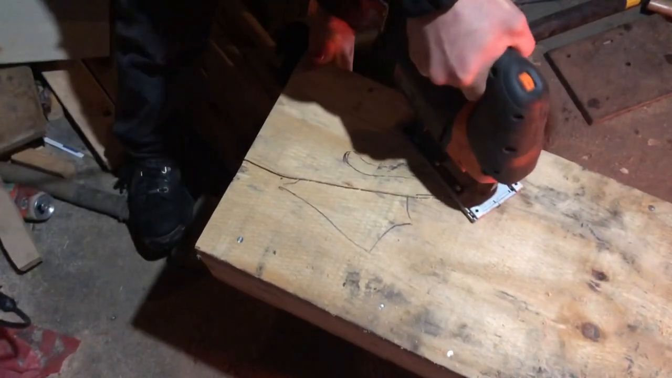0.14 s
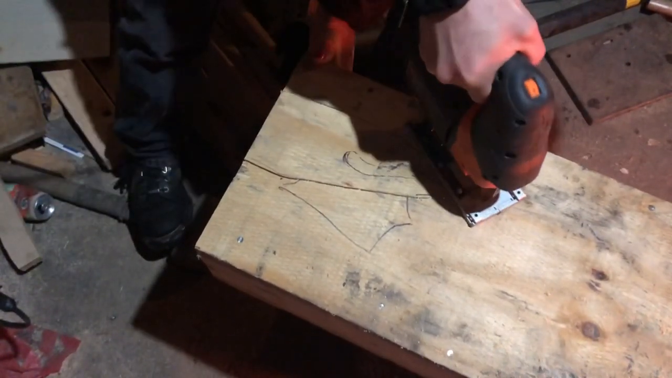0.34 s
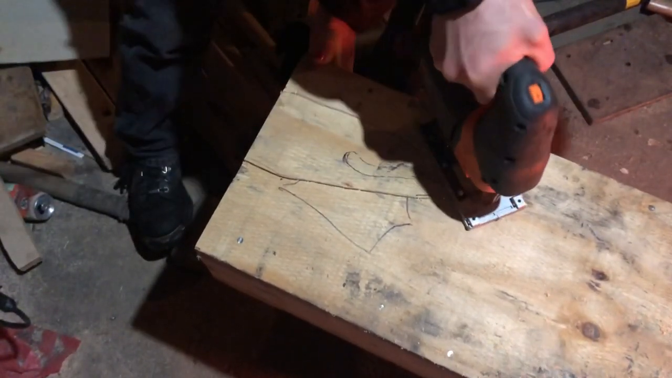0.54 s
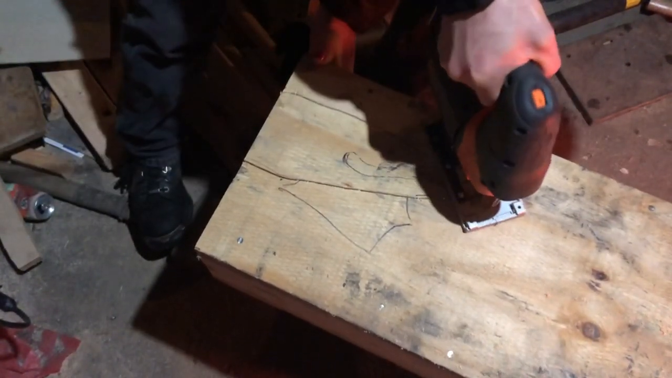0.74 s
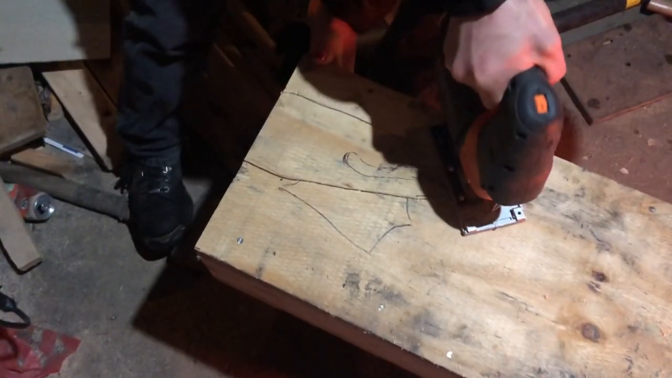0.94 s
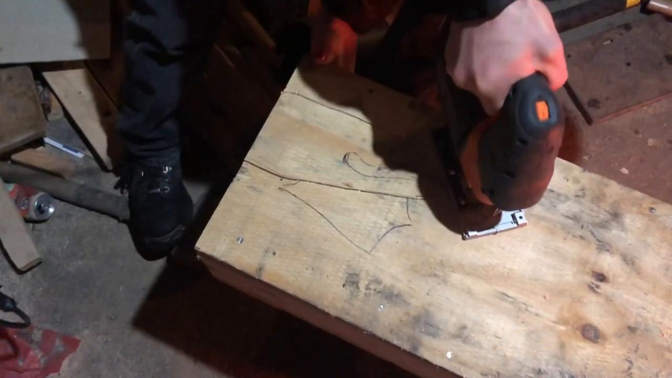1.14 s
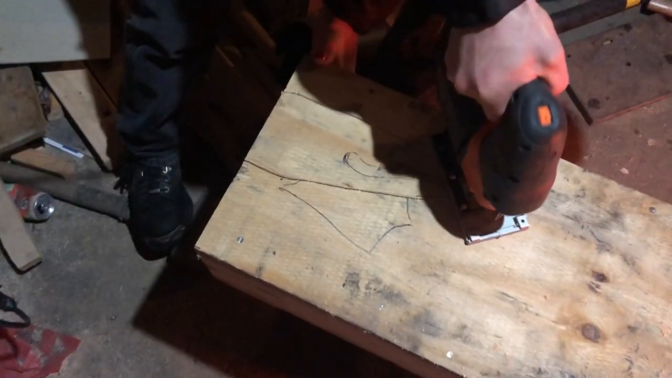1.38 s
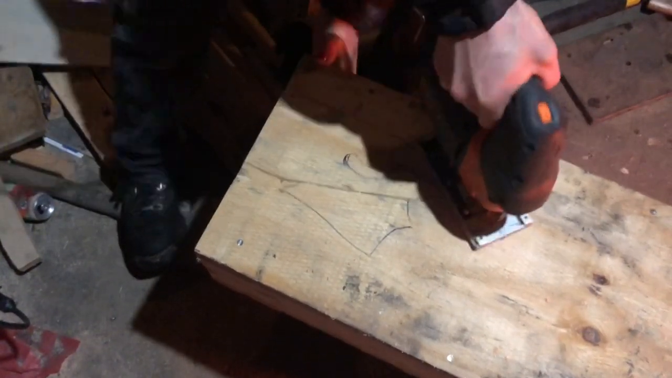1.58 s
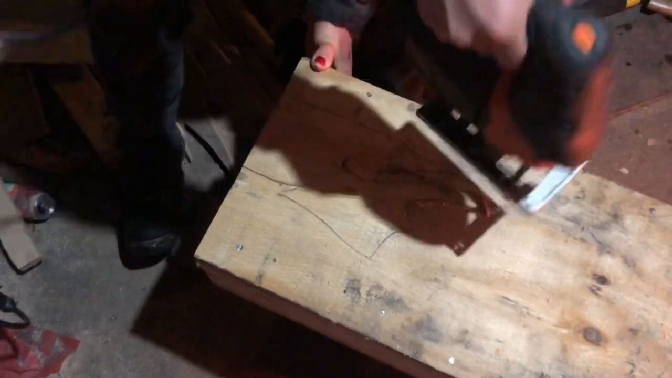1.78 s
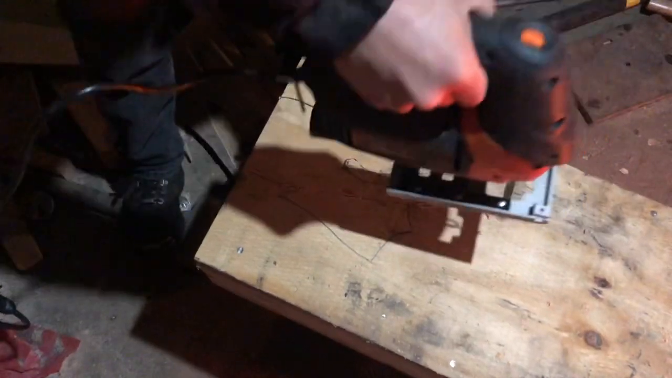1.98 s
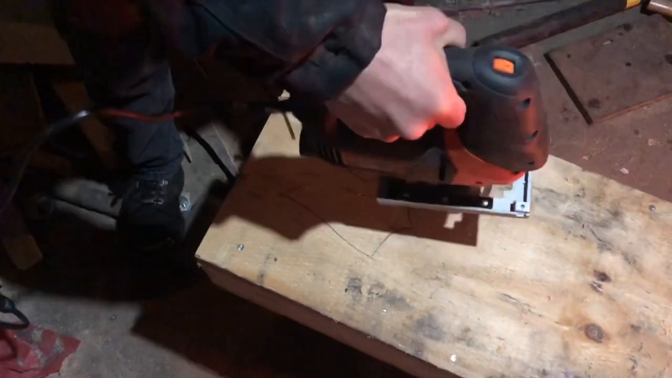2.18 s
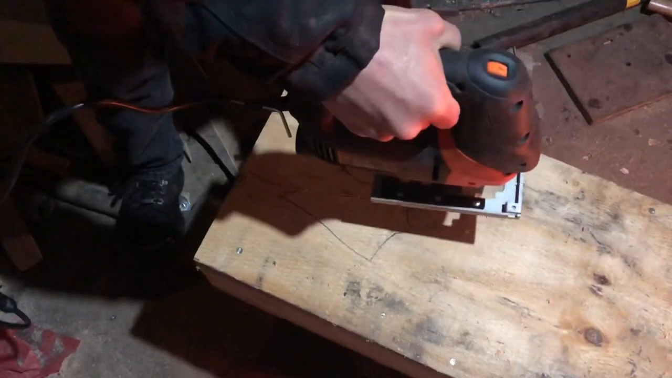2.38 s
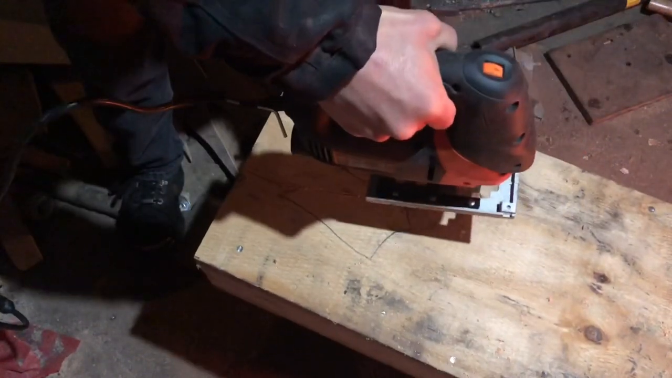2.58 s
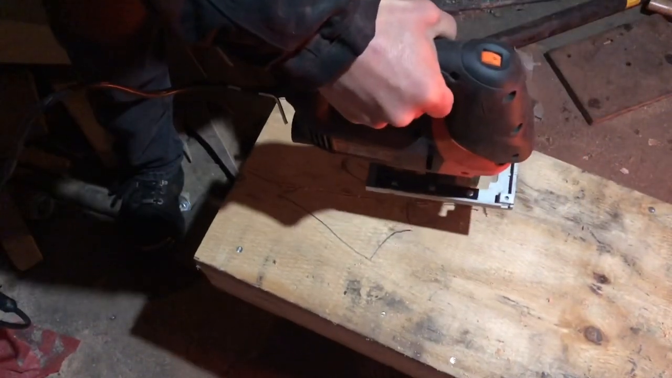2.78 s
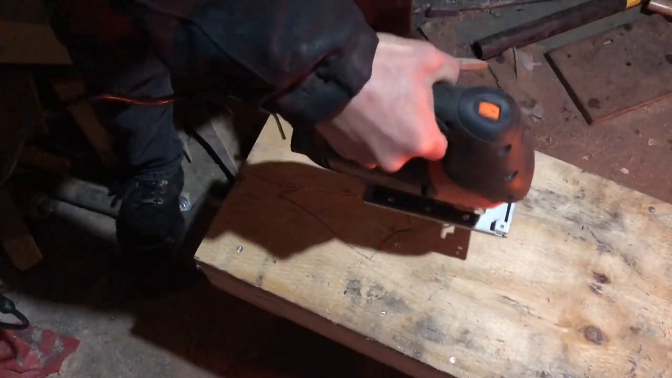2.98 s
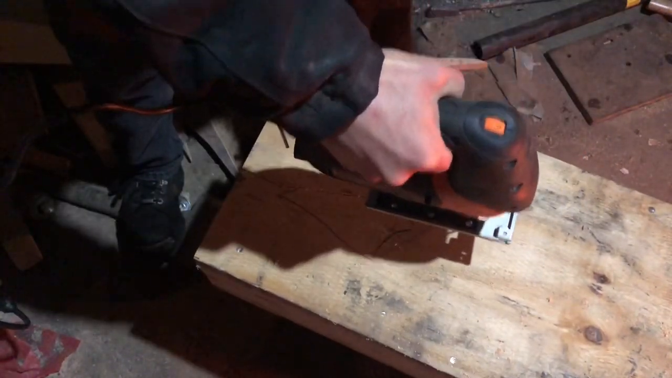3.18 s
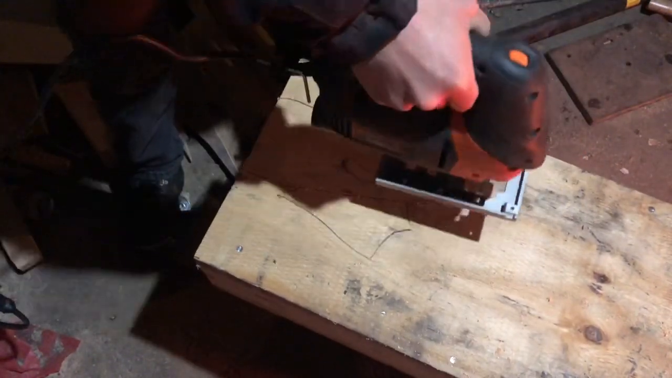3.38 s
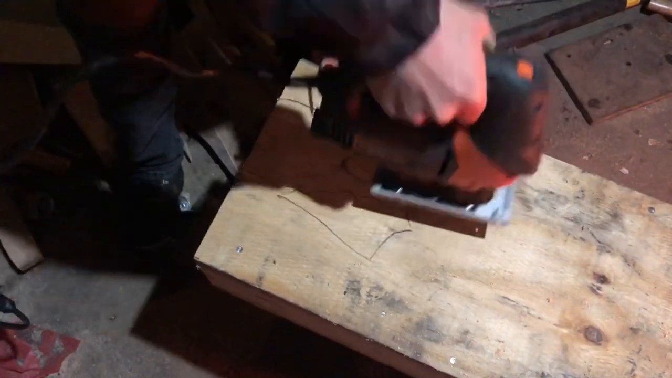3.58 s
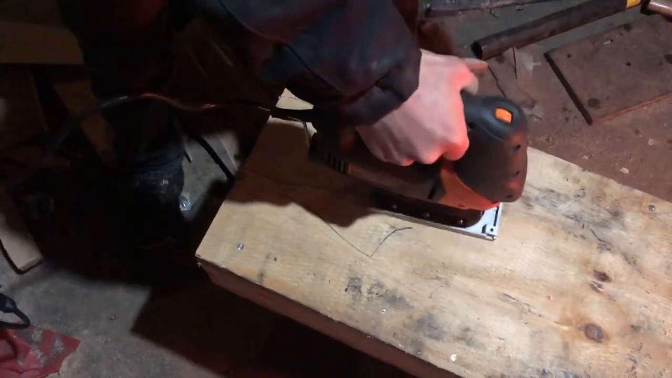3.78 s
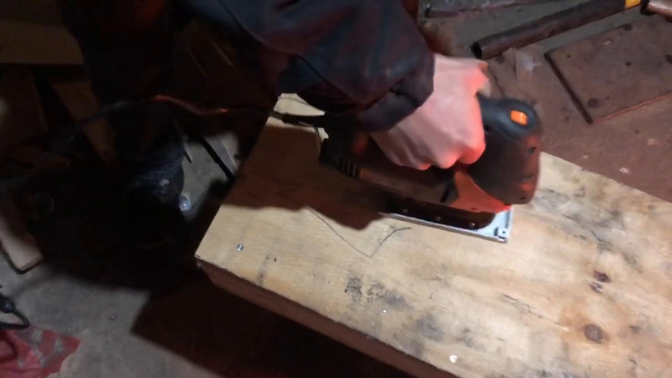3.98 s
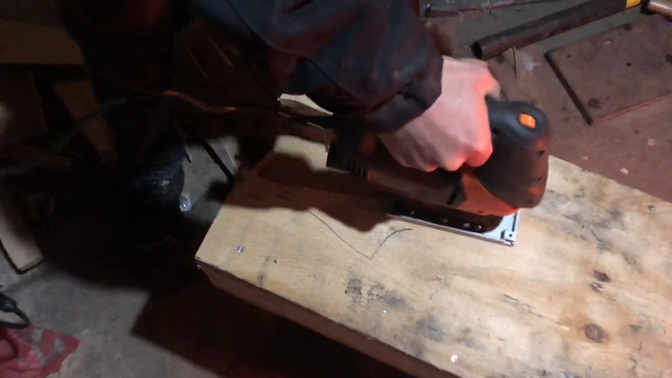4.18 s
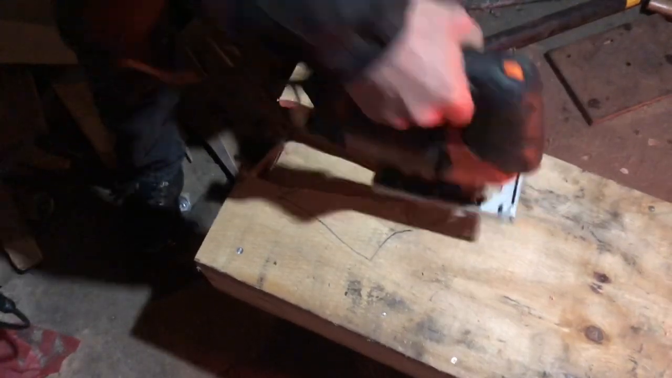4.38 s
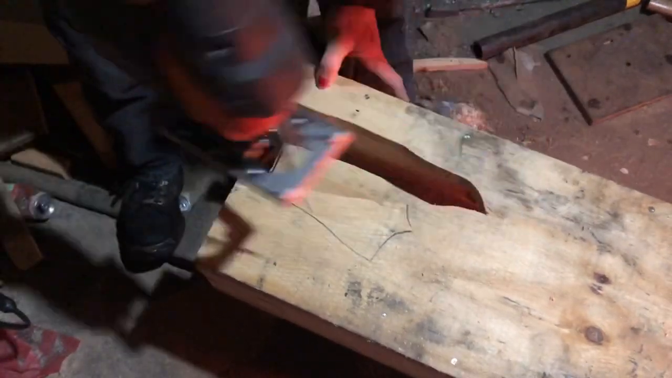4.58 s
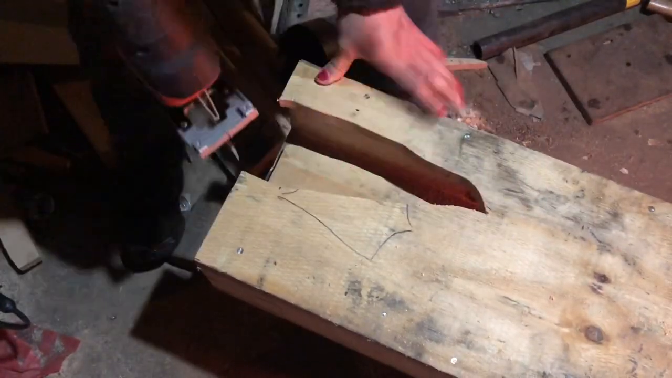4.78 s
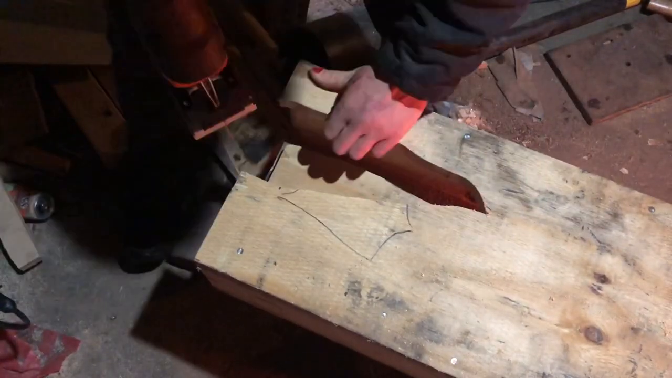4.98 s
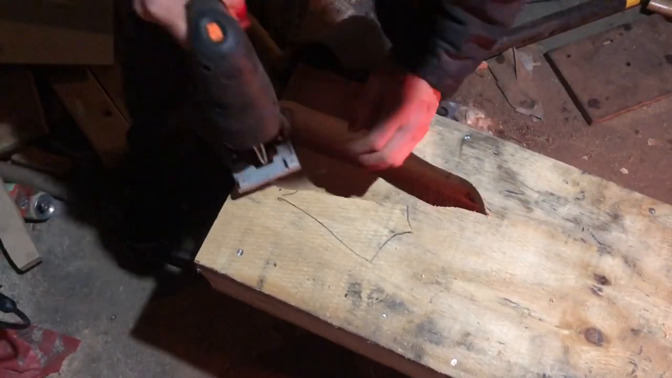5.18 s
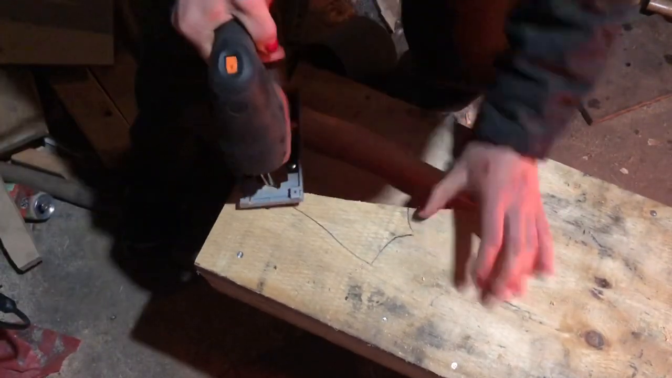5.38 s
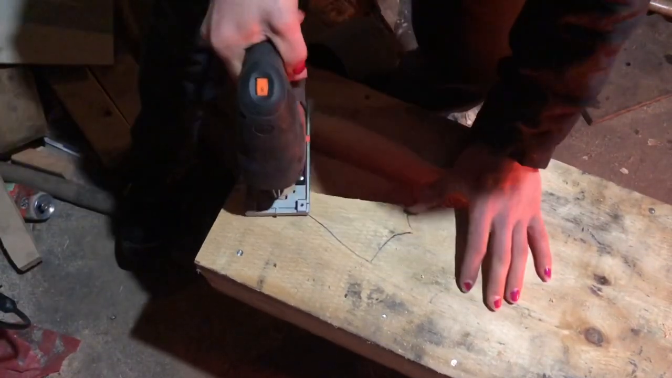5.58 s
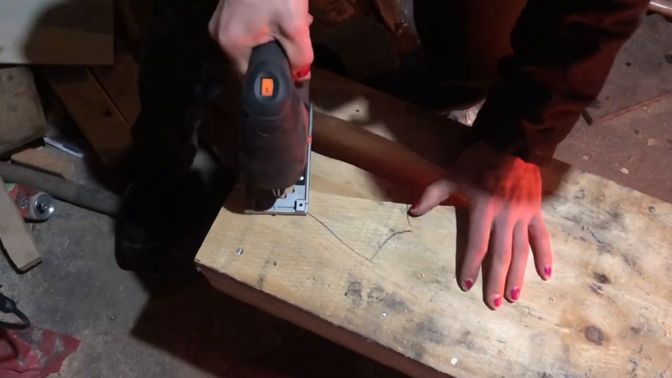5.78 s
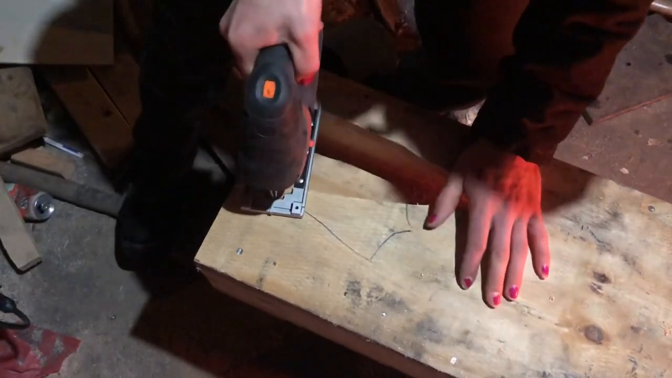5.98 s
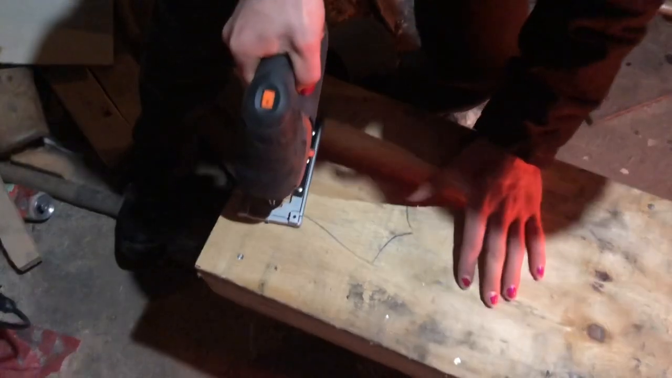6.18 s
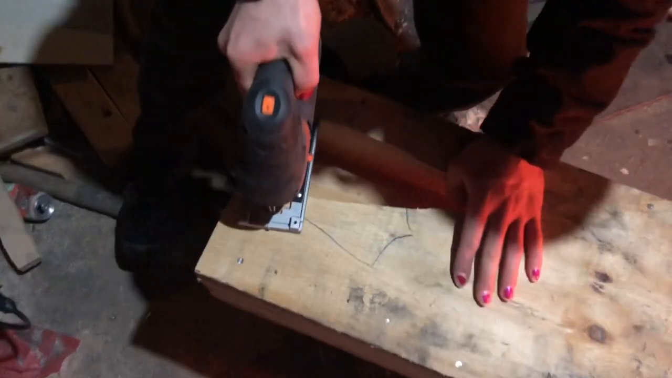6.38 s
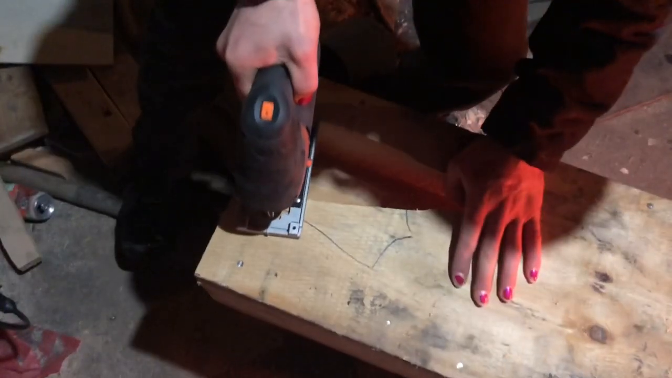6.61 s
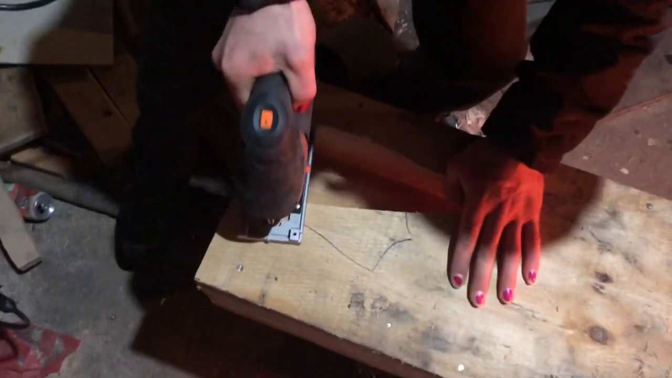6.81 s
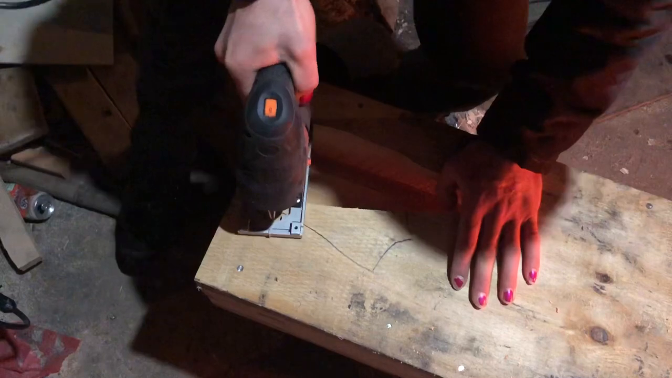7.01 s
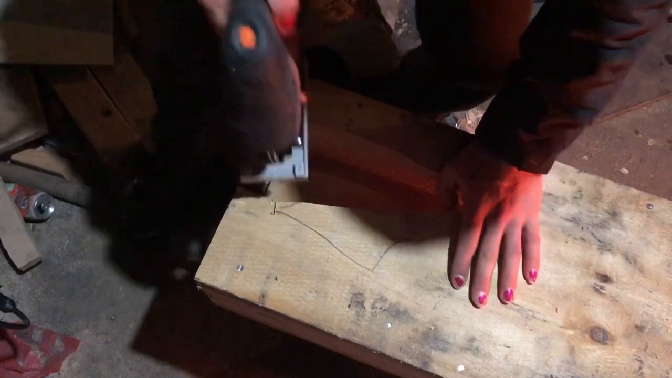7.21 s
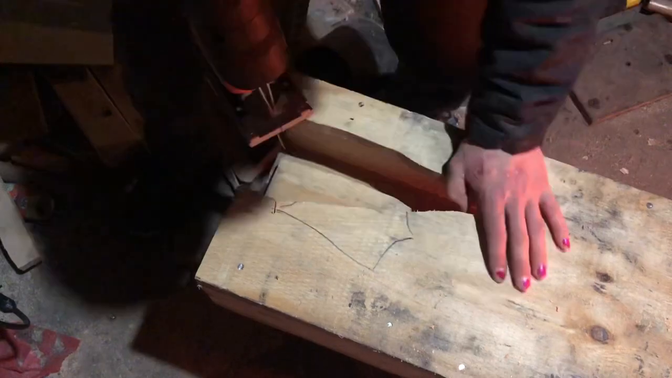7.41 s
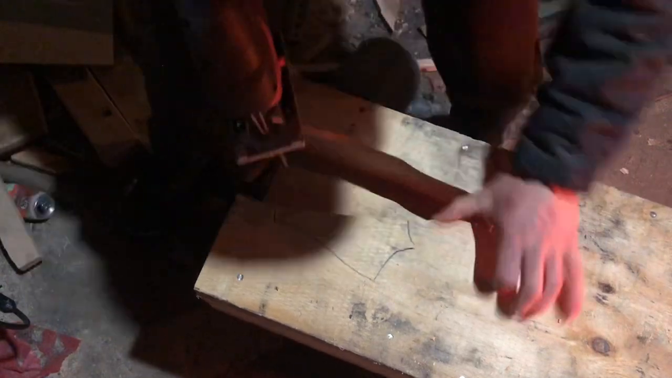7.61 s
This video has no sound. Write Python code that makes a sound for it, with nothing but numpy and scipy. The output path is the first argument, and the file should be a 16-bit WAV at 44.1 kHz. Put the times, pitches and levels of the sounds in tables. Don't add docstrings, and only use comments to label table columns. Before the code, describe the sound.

Close up in a workshop, an electric jigsaw makes three cuts in a thick wooden board: one steady, one very brief, one hard-biting and slowly rising in pitch. Each ends with a falling whine and airy motor hiss. Between them come sharp wooden knocks, light ticks and scraping of the metal shoe. A thin room buzz and low hum sit behind, with a short dull reflection from the clutter.

```python
import sys
import numpy as np
from scipy import signal
from scipy.fft import rfft, irfft, next_fast_len
from scipy.io import wavfile

SR = 44100
rng = np.random.default_rng(int(sys.argv[2]) if len(sys.argv) > 2 else 0)


def generate_wav(sig):
    pcm = np.round(np.clip(np.atleast_2d(sig).T, -1, 1) * 32767).astype(np.int16)
    wavfile.write(sys.argv[1], SR, pcm)


def amplitude_ratio(level_db):
    exponent = np.asarray(level_db, float) / 20
    return 10 ** exponent


N = 337364

TEETH_PER_STROKE = 74
FULL_SPEED_HZ = 6000
START_S, CLEAR_S = 0.01, 0.08
SNAG_RISE_DB_PER_S, SNAG_FALL_DB_PER_S = 900, 700

# trigger pulled, let go, blade clear [s], hiss, rasp [dB].
SPELLS = [
    (-.3, 1.39, 1.68, -33, -25),
    (3.728, 4.18, 4.42, -32, -23.5),
    (5.926, 6.82, 7.0, -30, -25.5),
]
# time [s], gear mesh rate [Hz].
SPEED = [
    [(0, 5950), (.12, 6050), (.38, 6090), (.9, 6115), (1.08, 6100), (1.22, 6035), (1.39, 6060), (1.5, 4700),
     (1.6, 3550), (1.75, 2380), (1.87, 1753), (2.06, 893), (2.28, 40)],
    [(3.72, 40), (3.77, 3600), (3.874, 5500), (3.92, 5760), (4.17, 6080), (4.22, 5550), (4.4, 4250),
     (4.63, 2900), (4.8, 2220), (4.97, 1460), (5.31, 40)],
    [(5.92, 40), (5.97, 4000), (6.05, 5050), (6.146, 5730), (6.22, 6080), (6.36, 6270), (6.55, 6390),
     (6.81, 6470), (6.86, 6160), (6.93, 5550), (6.99, 5050), (7.06, 4330), (7.32, 3030), (7.53, 2000),
     (7.65, 1620)],
]
# time [s], level, throb a stroke [dB].
WHINE = [
    [(0, -44, 4), (.3, -43, 3), (.33, -52, 3), (.38, -40, 1.5), (.54, -47, 1.5), (.59, -38, 1),
     (1.08, -39, 1), (1.15, -48, 2), (1.23, -42, 2), (1.39, -43, 2), (1.43, -37, 5), (1.55, -39, 5),
     (1.62, -54, 4)],
    [(3.8, -50, 7), (3.88, -35, 7), (4.18, -34, 7), (4.23, -37, 7), (4.28, -60, 7)],
    [(5.95, -50, 4), (6.04, -43, 6), (6.08, -36, 7), (6.14, -36, 7), (6.17, -45, 6), (6.23, -39, 6),
     (6.3, -42, 3), (6.36, -37, 2), (6.8, -39, 2), (6.87, -43, 4), (6.94, -39, 5), (7.0, -60, 2)],
]
# frequency [Hz], density [dB per Hz].
DRUMMING = [(15, -54), (25, -29), (129, -24), (162, -21.5), (252, -9.5), (357, -11.5), (486, 1), (636, -4),
            (918, -5), (1270, -16.5), (2500, -21.5), (3250, -18), (5500, -120)]
# frequency [Hz], density [dB per Hz].
RASP = [(700, -10), (1300, 2), (2000, -2.5), (3200, -7), (4500, -9), (8000, -11), (16000, -11)]
# frequency [Hz], level [dB], t60 [s].
KNOCK_MODES = [(438, -8.5, 0.24), (522, -2.5, 0.16), (783, -6, 0.22), (1190, -12, 0.28), (1170, -30, 0.3),
               (1340, -51, 0.54), (1900, -22, 0.39)]


def rms_one(x):
    return x / np.sqrt(np.mean(x ** 2) + 1e-20)


def filtered(x, order, hz, kind):
    return signal.sosfilt(signal.butter(order, hz, kind, fs=SR, output="sos"), x)


def in_time(rows, outside=None):
    s, *columns = np.transpose(rows)
    t = np.arange(N) / SR
    return [np.interp(t, s, column, outside, outside) for column in columns]


def bends(times, values):
    return np.interp(np.arange(N) / SR, times, values)


def gate(start_s, full_s, end_s, gone_s):
    return bends([start_s, full_s, end_s, gone_s], [0, 1, 1, 0])


def bursts(rows, index, rise_db, fall_db):
    t = np.arange(N) / SR
    out = 0
    for row in rows:
        start_s, held_s = row[:2]
        early_s = np.maximum(start_s - t, 0)
        late_s = np.maximum(t - start_s - held_s, 0)
        out = out + amplitude_ratio(row[index] - rise_db * early_s - fall_db * late_s)
    return out


def coloured(x, points):
    size = next_fast_len(N)
    hz, db = np.transpose(points)
    bins_hz = np.arange(size // 2 + 1) * SR / size
    shape_db = np.interp(np.log(bins_hz + 1), np.log(hz), db)
    return rms_one(irfft(rfft(x, size) * amplitude_ratio(shape_db), size)[:N])


def drift(rate):
    r = np.exp(-80 * np.pi * rate / SR)
    slow = signal.lfilter([1], [1, -2 * r, r * r], rng.standard_normal(N // 40 + 2002))[2000:]
    return np.interp(np.arange(N) / 40, np.arange(len(slow)), rms_one(slow))


def resonances(x, peaks):
    out = 0
    for k, (hz, width_hz, db) in enumerate(peaks):
        r = np.exp(-np.pi * width_hz / SR)
        zeros = np.array([1, 0, -1]) * (1 - r * r) / 2
        poles = [1, -2 * r * np.cos(2 * np.pi * hz / SR), r * r]
        out = out + (-1) ** k * amplitude_ratio(db) * signal.lfilter(zeros, poles, x)
    return out


def grains(spread_db):
    size = np.minimum(rng.exponential(1, N), 5)
    return rms_one(rng.standard_normal(N) * amplitude_ratio(spread_db * size))


def stroke_gain(turn, depth_db, twice_db):
    return amplitude_ratio(depth_db * np.cos(turn) + twice_db * np.cos(2 * turn + 1))


def room_tone():
    # frequency [Hz], density [dB per Hz].
    room = [(41, -43), (70, -58), (103, 1), (227, 1.5), (613, -3), (701, -3), (1550, -6), (2490, -9),
            (2850, -4), (4580, -17), (5740, -10), (6570, -16), (8420, -20), (10300, -22), (15500, -21)]
    # frequency, width [Hz], level [dB].
    buzz_bands = [(2720, 40, -5), (2860, 35, 2), (4210, 40, -9), (5810, 90, 0), (8500, 90, -4),
                  (9000, 80, -6), (11550, 110, -6), (13200, 180, -11), (14100, 110, -7)]
    room_db, buzz_db = -56.5, -62.5
    hum = amplitude_ratio(room_db - 2.5 + 0.38 * drift(3.4)) * coloured(rng.standard_normal(N), room)
    buzz = rms_one(resonances(rng.standard_normal(N), buzz_bands))
    return hum + amplitude_ratio(buzz_db + 0.74 * drift(30)) * buzz


def shop(x):
    t60_s, echo_db, gap_s = 0.21, -15, 0.006
    t = np.arange(SR // 2) / SR
    tail = signal.lfilter([1], [1, -0.6], rng.standard_normal(len(t)))
    tail = tail * amplitude_ratio(-60 * t / t60_s) * (t > gap_s)
    return amplitude_ratio(echo_db) * signal.fftconvolve(x, tail / np.sqrt(np.sum(tail ** 2)))[:N]


def ticks():
    # time [s], peak [dB], centre, width [Hz].
    tick_rows = [(1.4648, -23, 2000, 3000), (1.4937, -20, 13500, 3000), (1.611, -22, 3000, 2000),
                 (1.6347, -16, 3000, 4000), (1.644, -16.5, 3800, 1500), (1.669, -18, 1760, 1200),
                 (2.0141, -20, 1680, 1800), (2.0205, -24, 11000, 9000), (2.1, -27, 10800, 9000),
                 (2.242, -28.5, 1440, 1440), (2.341, -47, 8000, 9000), (3.0344, -24, 4930, 8950),
                 (3.2255, -44, 10000, 6000), (3.262, -42, 9000, 6000), (3.3412, -43, 8000, 6000),
                 (3.5208, -29, 5000, 8000), (3.5385, -24, 6300, 6000), (3.576, -28, 7860, 6000),
                 (3.734, -25, 3000, 4920), (3.757, -11, 2720, 2940), (4.228, -10, 2960, 1800),
                 (4.242, -15, 3000, 1800), (4.258, -18, 3000, 1500), (4.269, -21, 3100, 1500),
                 (4.284, -12, 2800, 2000), (4.338, -18, 3000, 2000), (5.2752, -38, 1300, 1500),
                 (5.4285, -43, 6000, 5000), (6.494, -11, 9000, 8000), (1.69, -28, 1900, 300),
                 (7.065, -16, 13900, 3000), (7.065, -21.5, 11100, 1200)]
    t60_s = 0.015
    out, t = np.zeros(N + SR), np.arange(SR // 20) / SR
    noises = rng.standard_normal((len(tick_rows), len(t)))
    for (s, peak_db, hz, width_hz), noise in zip(tick_rows, noises):
        spit = resonances(noise * amplitude_ratio(-60 * t / t60_s), [(hz, width_hz, 0)])
        spit = resonances(spit, [(hz, 2 * width_hz, 0)])
        first = round(s * SR)
        out[first:first + len(t)] += amplitude_ratio(peak_db) * spit / np.abs(spit).max()
    return out[:N]


def scrapes():
    # start, held [s], body, grit [dB].
    drags = [(3.23, 0.014, -44, -53), (3.305, 0.025, -52, -59), (3.41, 0.03, -54, -66),
             (3.515, 0.053, -43, -46), (3.575, 0.026, -35, -54), (3.635, 0.043, -57, -75),
             (5.44, 0.0067, -48, -71), (5.48, 0.073, -66, -72), (5.3, .025, -63, -68)]
    rise_db_per_s, grit_rise_db_per_s, fall_db_per_s = 700, 2500, 502
    rub = grains(spread_db=-5.0) * amplitude_ratio(3.9 * drift(48))
    modes = [(hz, 110, db) for hz, db, _ in KNOCK_MODES]
    body = rms_one(resonances(rub, modes) + 0.027 * coloured(rub, DRUMMING))
    grit = amplitude_ratio(4.5) * coloured(rub, RASP)
    body_gain = bursts(drags, 2, rise_db_per_s, fall_db_per_s)
    return body_gain * body + bursts(drags, -1, grit_rise_db_per_s, fall_db_per_s) * grit


def knocks():
    # time [s], peak [dB], main ring [Hz], click under the peak [dB], ring t60 [s].
    taps = [(1.629, -3, 485, -23, 0.15), (2.092, -18, 522, -8, 0.12), (2.242, -13.5, 563, -19, 0.065),
            (2.651, -24.5, 522, -5.5, 0.12), (2.671, -31, 500, 2, .08), (2.852, -19.5, 583, -42, 0.052),
            (3.035, -22, 523, -3.5, 0.1), (3.513, -18.5, 516, -11.5, 0.91), (3.784, -5, 896, -19, 0.12),
            (4.339, -12, 1090, -15, 0.09), (4.759, -25, 1360, 3, 0.055), (7.03, -10.5, 1103, -22, 0.21),
            (7.056, -16, 1090, -25, 0.073), (7.373, -19, 543, -39, 0.15)]
    thuds = [(1.659, -6, 394, -9, 0.18), (2.013, -13, 522, -14, 0.12), (2.34, -20.5, 484, -36, 0.06),
             (3.539, -15, 800, -26, 0.31), (3.755, -32, 1460, -13, .09), (5.275, -12, 930, -39, 0.043),
             (5.344, -22, 494, -30, 0.074), (5.432, -22.5, 780, -43, 0.053),
             (5.453, -15.5, 940, -34, 0.042), (7.052, -10.5, 571, -13, 0.091), (7.463, -23, 1435, -5, 0.18)]
    bumps = [(3.254, -33, 506, 2, 0.19), (3.57, -3.5, 807, -26, 0.05), (3.74, -20.5, 235, -50, 0.19),
             (3.8, -27, 198, -50, 0.15), (3.92, -22, 215, -50, 0.056), (4.612, -34, 231, -50, .08),
             (5.382, -15, 452, -61, 0.046), (5.95, -19, 222, -50, 0.074), (6.01, -9, 232, -50, 0.1)]
    hits = []
    for rows, thump_db in [(taps, -28.5), (thuds, -24.5), (bumps, -16.5)]:
        hits += [(*row, thump_db) for row in rows]
    hits.sort()
    out, t = np.zeros(N + SR), np.arange(SR // 2) / SR
    chance_db = rng.normal(0, 3, (len(hits), len(KNOCK_MODES)))
    noise = rng.standard_normal((len(hits), len(t)))
    dull = rms_one(filtered(noise, 2, [400, 2000], "band"))
    low = rms_one(filtered(noise, 2, [120, 320], "band"))
    bright = rms_one(filtered(noise, 2, 3200, "high"))
    for k, (s, peak_db, hz, click_db, t60_s, thump_db) in enumerate(hits):
        ring = np.sin(2 * np.pi * hz * t) * amplitude_ratio(-60 * t / t60_s)
        for (mode_hz, db, mode_t60_s), luck_db in zip(KNOCK_MODES, chance_db[k]):
            decay_db = 60 * t / mode_t60_s * 0.19 / t60_s
            ring += amplitude_ratio(db + luck_db + 0.086 * click_db - decay_db) * np.sin(2 * np.pi * mode_hz * t)
        slap_decay = 0.49 * amplitude_ratio(-60 * t / 0.045) + 0.46 * amplitude_ratio(-60 * t / (0.86 * t60_s))
        slap = amplitude_ratio(0.44 * click_db + 6.5) * dull[k] * slap_decay
        thump = amplitude_ratio(thump_db + 5.0 - 60 * t / 0.21) * low[k] * np.minimum(t / 0.0012, 1)
        click_decay = amplitude_ratio(-60 * t / 0.013) + 0.06 * amplitude_ratio(-60 * t / 0.12)
        click = amplitude_ratio(click_db + 12) * bright[k] * click_decay
        knock = ring * np.minimum(t / 0.0032, 1) + slap + thump + click
        first = round(s * SR)
        out[first:first + len(t)] += amplitude_ratio(peak_db - 17.5) * knock
    return out[:N]


def snags(index):
    # start, held [s], board, rasp, hiss [dB].
    snag_rows = [(1.5, 0.15, -63, -58, -44), (1.645, 0.021, -55, -45, -46), (3.742, 0.023, -25.5, -35, -53),
                 (3.765, 0.055, -32, -24.5, -34), (3.825, 0.065, -30, -29, -29),
                 (3.875, 0.052, -23, -22.5, -36), (4.15, 0.004, -16.5, -35, -55),
                 (4.225, 0.074, -39, -29, -53), (4.37, .2, -73, -43, -42.5), (5.96, 0.12, -54, -60, -32),
                 (6.41, .04, -33, -29, -39)]
    running = sum(gate(on, on + START_S, clear, clear + CLEAR_S) for on, _, clear, _, _ in SPELLS)
    return running * bursts(snag_rows, index, SNAG_RISE_DB_PER_S, SNAG_FALL_DB_PER_S)


def motor_levels(mesh_hz):
    lifted = [2, 3, 1]
    hiss_db_per_decade, whine_db_per_decade = 16, 27
    coast_whine_db, slow_hz = -52, 1700
    groan_db, groan_slow_db, groan_crawl_db = -22, -8, -16
    decades = np.log10(mesh_hz / FULL_SPEED_HZ)
    hiss = snags(index=4)
    for (on, off, clear, hiss_db, _), speed, lifted_db in zip(SPELLS, SPEED, lifted):
        stop = speed[-1][0]
        turning = gate(on, on + START_S, stop, stop + START_S)
        lift_db = bends([off, clear], [0, lifted_db])
        hiss += turning * amplitude_ratio(hiss_db + hiss_db_per_decade * decades + lift_db)
    loaded_whine = amplitude_ratio(in_time(np.concatenate(WHINE))[0] + 3.5) * (mesh_hz > slow_hz)
    whine = np.maximum(loaded_whine, amplitude_ratio(coast_whine_db + whine_db_per_decade * decades))
    groan = np.interp(mesh_hz, [0, slow_hz / 2, slow_hz, FULL_SPEED_HZ],
                      [groan_crawl_db, groan_slow_db, groan_slow_db, groan_db])
    treble = 0.38 + 0.14 * (1 - mesh_hz / FULL_SPEED_HZ)
    return hiss, treble, whine, groan


def motor(mesh_hz, turn):
    # frequency [Hz], density [dB per Hz].
    air_points = [(71, -52), (120, -34), (370, -12), (500, -8), (920, -3.5), (1400, -3), (3500, -1),
                  (6500, -6), (7800, -4.5), (10800, -7.5), (13500, -4.5), (17000, -5)]
    # frequency, width [Hz], level [dB].
    housing = [(1480, 220, -3), (2680, 200, -6), (3550, 300, -5), (4100, 90, -6), (5150, 280, -2.5),
               (7700, 600, -3), (13600, 800, -4)]
    # from, to [s], multiple of mesh rate, level [dB].
    overtones = [(0, 1.5, 2.0, -45), (1.865, 1.98, 9.0, -46), (1.98, 2.07, 9.0, -53),
                 (1.85, 1.96, 5.8, -52), (1.8, 1.87, 7.0, -50), (1.815, 1.88, 7.8, -50),
                 (1.96, 2.02, 11.5, -53), (4.55, 4.75, 4.0, -49), (4.75, 4.95, 6.0, -51),
                 (7.08, 7.2, .38, -42), (4.39, 4.45, .37, -38), (1.715, 1.775, 6.0, -45),
                 (4.95, 5.15, 9.0, -53), (3.772, 3.796, 1.4, -25), (3.778, 3.792, .94, -28),
                 (6.18, 6.32, 2.0, -43), (6.3, 6.85, .5, -44), (6.98, 7.07, 2.5, -43),
                 (6.99, 7.04, 3.0, -42), (7.53, 7.6, 6.0, -52), (1.866, 1.886, 1.0, -43),
                 (1.868, 1.884, 2.0, -42), (1.966, 1.986, 1.0, -47), (1.968, 1.984, 2.5, -45),
                 (1.966, 1.98, 3.5, -47), (4.958, 4.98, 1.0, -43), (4.958, 4.974, 2.0, -45),
                 (4.956, 4.974, 2.5, -43), (4.98, 5.0, 1.5, -44), (5.014, 5.036, 2.5, -43),
                 (5.044, 5.072, 2.0, -44), (5.08, 5.11, 1.5, -47), (5.08, 5.105, 2.5, -47),
                 (7.17, 7.23, .72, -42), (7.11, 7.15, 1.0, -42)]
    # mesh [Hz], twice a stroke, once a stroke [dB].
    crank_throb = [(0, 1.5, 2), (2000, 2.2, 1.3), (4200, 1.8, .5), (5600, .7, .5)]
    groan_top_hz, dull_below_hz, dull_cut_hz = 4500, 950, 10000
    t = np.arange(N) / SR
    level, tilt, whine_gain, groan_db = motor_levels(mesh_hz)

    air = coloured(grains(spread_db=3.5), air_points)
    shell = sum(amplitude_ratio(2.2 * drift(3) + 2.5 * drift(14)) * resonances(air[::-1], [mode]) for mode in housing)
    air = rms_one(air + 1.3 * shell)
    top = filtered(air, 1, 5000, "high")
    dull = filtered(air, 2, dull_cut_hz, "low")

    mesh = TEETH_PER_STROKE * turn
    rough = 0.9 * drift(90)
    groan = 0
    for k in range(2, 19):
        tone = np.sin(k * mesh / 2 + k * k + 0.6 * rough) * (k * mesh_hz < 0.7 * SR)
        groan = groan + amplitude_ratio(5.5 * drift(30)) * tone / (1 + (k * mesh_hz / 2 / groan_top_hz) ** 2)

    crawl = np.clip(1 - mesh_hz / dull_below_hz, 0, 0.8)
    flutter = amplitude_ratio(0.7 * drift(1) + 0.8 * drift(66))
    hiss = ((1 - crawl) * (air + tilt * top) + 1.4 * crawl * dull) * flutter
    hiss += amplitude_ratio(groan_db - 9) * groan

    throb_db = in_time(np.concatenate(WHINE))[1]
    jitter = np.minimum(0.35 + 0.09 * throb_db, 0.85) * rough
    whine = whine_gain * amplitude_ratio(3 * drift(30) + 0.8 * drift(6) - 1) * np.sin(mesh + jitter)
    for start, end, multiple, db in overtones:
        swell = np.clip(np.minimum(t - start, end - t) / (0.055 * (end - start)), 0, 1)
        swell = swell * (multiple * mesh_hz < 0.36 * SR)
        whine += swell * amplitude_ratio(db - 1 + 3 * drift(30)) * np.sin(multiple * mesh + 0.55 * rough)

    at_hz, twice_db, once_db = np.transpose(crank_throb)
    crank = stroke_gain(turn + 0.3 * np.sin(2 * turn), np.interp(mesh_hz, at_hz, once_db),
                        np.interp(mesh_hz, at_hz, twice_db))
    throb = amplitude_ratio(-0.4 * throb_db) * stroke_gain(turn + 0.71, throb_db, throb_db / 2)
    return level * hiss * crank + whine * throb


def rasp_level(mesh_hz):
    rasp_db_per_decade = 45
    inside = 0
    for on, _, clear, _, db in SPELLS:
        inside = inside + amplitude_ratio(db) * gate(on, on + START_S, clear, clear + CLEAR_S)
    return inside * amplitude_ratio(rasp_db_per_decade * np.log10(mesh_hz / FULL_SPEED_HZ)) + snags(index=3)


def load_levels(spell, load):
    tone_in_db, tone_out_db, base_shake_db = -21, -33, -5.5
    fade_s, ends_early_s = 0.063, 0.024
    start, full, free, db, shake_db = load
    shake_end = free - ends_early_s
    shake = amplitude_ratio(base_shake_db + shake_db) * gate(start - fade_s / 2, start, shake_end - fade_s, shake_end)
    loaded = gate(start - fade_s / 2, start, free, free + fade_s / 2)
    build_db = bends([start, full, spell[1], free], [tone_in_db, 0, 0, tone_out_db])
    return loaded * amplitude_ratio(db + build_db), shake


def cutting(mesh_hz, turn):
    # time [s], level [dB].
    pushes = [
        [(0, -22.5), (.25, -23), (.6, -25), (1.0, -25.5), (1.4, -22.5), (1.61, -23), (1.66, -61), (1.71, -58),
         (1.82, -71)],
        [(3.728, -53), (3.76, -35), (3.94, -26), (4.06, -21.5), (4.12, -25.5), (4.19, -20.5), (4.29, -32.5),
         (4.38, -59), (4.46, -60)],
        [(5.926, -32), (5.945, -21), (6.0, -14.5), (6.3, -21), (6.75, -21.5), (6.82, -23.5), (6.89, -35.5),
         (7.06, -32), (7.11, -68)],
    ]
    # frequency, width [Hz], level [dB].
    boards = [
        [(300, 20, -6), (410, 40, -5), (495, 30, -3), (785, 80, 2), (930, 60, -6), (1170, 50, -6),
         (1440, 120, -5), (1895, 45, -5), (2280, 40, -10)],
        [(474, 45, -4), (620, 70, -2), (740, 80, -1), (930, 120, -3), (1180, 60, -4), (1448, 60, -3)],
        [(452, 34, 3), (689, 38, -2), (930, 50, 2), (1015, 50, 1), (1150, 70, -3), (1460, 42, -9),
         (1890, 34, -7)],
    ]
    # multiple of stroke rate, level [dB].
    stroke_tones = [
        [(1, -32), (2, -24), (3, -13), (4, -15), (5, -4), (6, 2), (7, -7), (8, -16), (9, -4), (10, -3),
         (11, -8), (12, -16)],
        [(1, -28), (2, -20), (3, -15), (4, -15), (5, -5), (6, 0), (7, -12), (8, -7), (9, 0), (10, -5), (11, -5),
         (12, -10)],
        [(1, -23), (2, -8), (3, -7), (4, -15), (5, -5), (6, -7), (7, -8), (8, 2), (9, -10), (10, -8), (11, -2),
         (12, -5)],
    ]
    # from, fully, free [s], stroke tone, shake [dB].
    loads = [
        (-.25, .5, 1.58, -34, 0),
        (3.85, 3.9, 4.34, -34, 0),
        (5.99, 6.38, 6.9, -32, 3),
    ]
    bounces = [2.5, 2.0, 2.0]
    ring_shares = [1.9, 1.3, 2.4]
    # start, held [s], level [dB].
    singing = [
        [(1.49, 0.06, -27.5), (1.615, 0.04, -25)],
        [(4.225, 0.052, -20.5), (4.335, 0.0072, -36)],
    ]
    # frequency, width [Hz], level [dB].
    singing_modes = [
        [(420, 25, -6), (490, 20, 0), (800, 30, -10), (1900, 40, -9)],
        [(950, 120, 0), (1150, 100, -3), (2700, 250, -8), (3200, 400, -7)],
    ]
    rasp_cut_hz, strokes_per_bounce = 1300, 3
    clack_share, clack_spread_db = 0.4, 2.5

    bite = amplitude_ratio(0.4 * drift(12) + 1.5 * drift(50))
    tearing = grains(spread_db=2.42) * bite * stroke_gain(turn, depth_db=5.2, twice_db=1.2)
    rasp = filtered(coloured(tearing, RASP), 2, rasp_cut_hz, "high")
    out = rasp_level(mesh_hz) * amplitude_ratio(-4.5) * rasp
    for rows, modes in zip(singing, singing_modes):
        song = rms_one(resonances(tearing, modes))
        out += bursts(rows, -1, SNAG_RISE_DB_PER_S, fall_db=278) * song

    broad = coloured(tearing, DRUMMING)
    upper = filtered(broad, 4, 330, "high")
    shake = filtered(broad, 2, 300, "low")
    bounce = np.cos(turn / strokes_per_bounce + 0.8 * drift(4))
    harmonics = [amplitude_ratio(1.8 * drift(5)) * np.sin(k * turn + 0.22 * drift(9) + k * k)
                 for k, _ in stroke_tones[0]]
    reversals = np.diff(np.floor(turn / (2 * np.pi)), prepend=0)
    reversals = reversals * amplitude_ratio(clack_spread_db * rng.standard_normal(N)) * rng.choice([-1, 1], N)
    struck = tearing + clack_share * rms_one(signal.lfilter([1], [1, -0.8], reversals))
    snag_gain = snags(index=2)
    cuts = zip(pushes, boards, stroke_tones, SPELLS, loads, bounces, ring_shares)
    for push, modes, tones, spell, load, bounce_db, ring_share in cuts:
        push_gain = amplitude_ratio(in_time(push, -200)[0])
        push_gain += (push_gain > 1e-9) * snag_gain
        tone_gain, shake_gain = load_levels(spell, load)
        drum = rms_one(3.65 * upper + ring_share * rms_one(resonances(struck, modes)))
        out += amplitude_ratio(-24.5) * shake_gain * shake
        out += amplitude_ratio(-6.5 + bounce_db * bounce) * push_gain * drum
        out += tone_gain * amplitude_ratio(1) * sum(amplitude_ratio(db) * tone for (_, db), tone in zip(tones, harmonics))
    return out


def scene():
    bass_cut_hz = 110
    mesh_hz, = in_time(np.concatenate(SPEED))
    turn = 2 * np.pi * np.cumsum(mesh_hz / TEETH_PER_STROKE) / SR
    light = ticks() + scrapes() + knocks() + motor(mesh_hz, turn)
    near = cutting(mesh_hz, turn) + filtered(light, 4, bass_cut_hz, "high")
    return (near + shop(near) + room_tone())[None]


def roll_off(x):
    return signal.sosfilt(signal.butter(12, 17080, fs=SR, output="sos"), x)


def record(dry):
    ceiling, cutoff_hz = 0.55, 16100
    rounded = ceiling * np.tanh(dry / ceiling)
    steep = signal.cheby2(22, 60, cutoff_hz, fs=SR, output="sos")
    return roll_off(signal.sosfilt(steep, rounded))


dry = scene()
out = record(dry)
generate_wav(out)
```